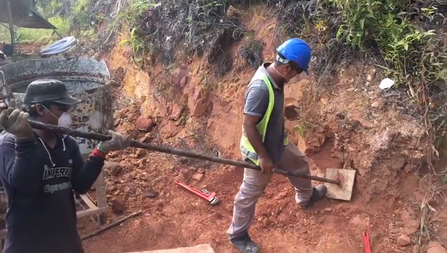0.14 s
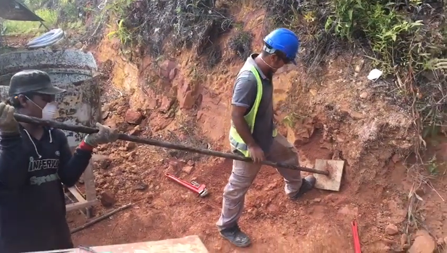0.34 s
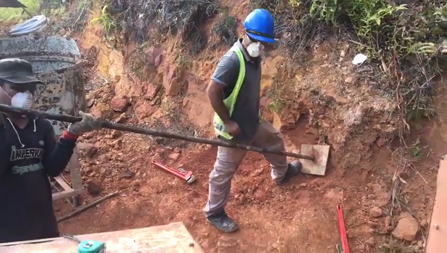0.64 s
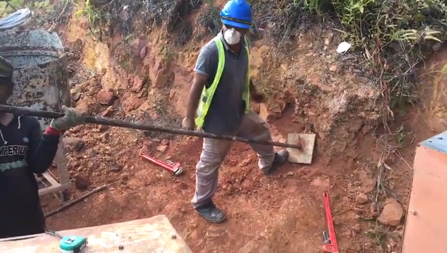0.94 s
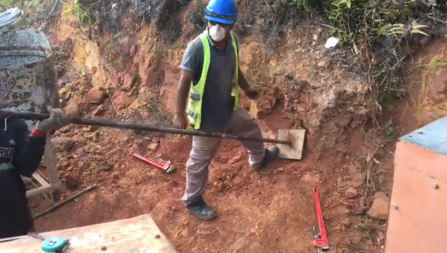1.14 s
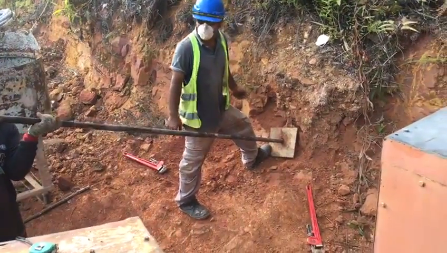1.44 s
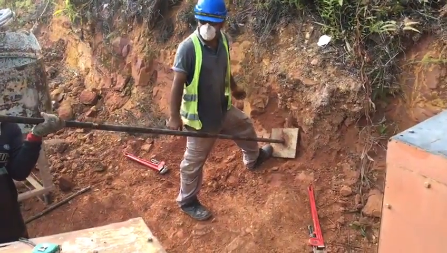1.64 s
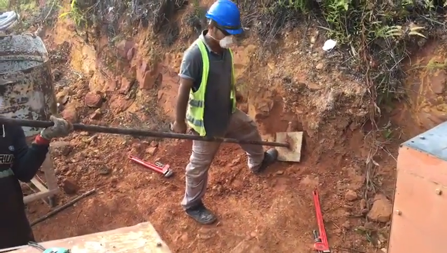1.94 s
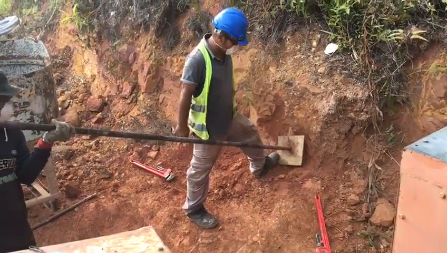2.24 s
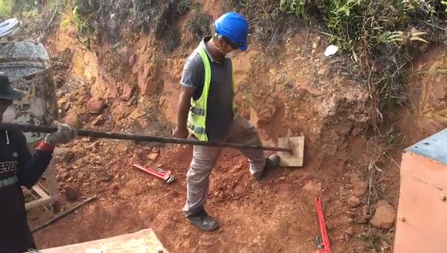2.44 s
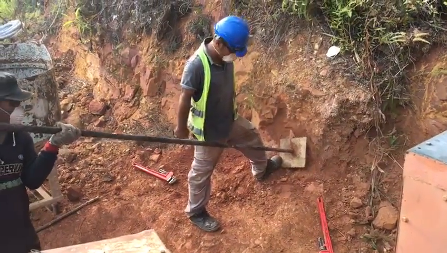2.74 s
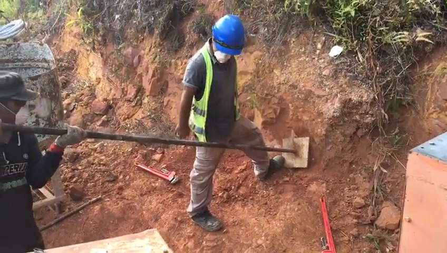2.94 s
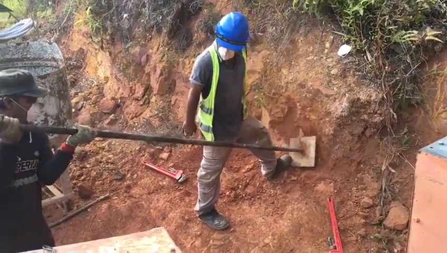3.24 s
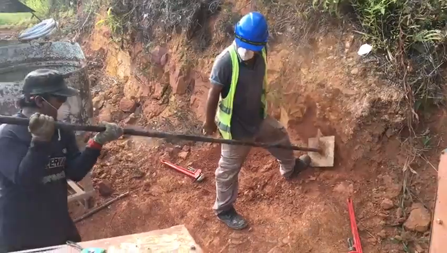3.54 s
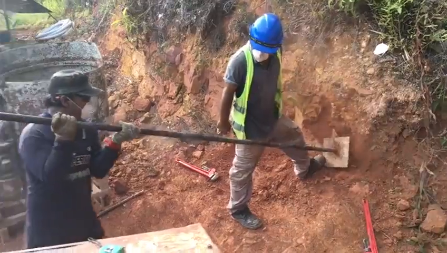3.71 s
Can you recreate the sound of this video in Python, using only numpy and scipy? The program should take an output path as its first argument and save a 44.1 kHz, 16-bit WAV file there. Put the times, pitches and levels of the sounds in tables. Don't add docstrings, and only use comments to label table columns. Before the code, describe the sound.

Pneumatic hammer bursts into rapid clanging blows over a droning compressor and broad rushing air outdoors.

```python
import sys
import numpy as np
from scipy import signal
from scipy.fft import rfft, irfft
from scipy.io import wavfile
from scipy.ndimage import uniform_filter1d

SR = 44100
rng = np.random.default_rng(int(sys.argv[2]) if len(sys.argv) > 2 else 0)


def log_audio(samples):
    frames = np.atleast_2d(samples).T
    limited = np.clip(frames, -1, 1)
    pcm = np.round(limited * 32767).astype(np.int16)
    wavfile.write(sys.argv[1], SR, pcm)


def invert_db(x):
    u = np.asarray(x, float) / 20
    return 10 ** u


N = 170667

FIRST_BLOW_S = 1.3725


def rms_one(x):
    return x / np.sqrt(np.mean(x ** 2) + 1e-20)


def in_time(rows, s=None):
    t, *columns = np.transpose(rows)
    at = np.arange(N) / SR if s is None else s
    return [np.interp(at, t, column) for column in columns]


def drift(rate_hz):
    r = np.exp(-2 * np.pi * rate_hz / SR)
    wander = signal.lfilter([1], [1, -2 * r, r * r], rng.standard_normal(N + SR))
    return rms_one(wander[SR:])


def band(x, low_hz, high_hz):
    return signal.sosfilt(signal.butter(2, [low_hz, high_hz], "band", fs=SR, output="sos"), x)


def ring(x, hz, t60_s):
    r, w = invert_db(-60 / (t60_s * SR)), 2 * np.pi * hz / SR
    return signal.lfilter([0, np.sin(w)], [1, -2 * r * np.cos(w), r * r], x + 1e-18)


def resonance(x, hz, width_hz):
    r = np.exp(-np.pi * width_hz / SR)
    top = np.array([1, 0, -1]) * (1 - r * r) / 2
    return signal.lfilter(top, [1, -2 * r * np.cos(2 * np.pi * hz / SR), r * r], x)


def clicks(s, db):
    out, inside = np.zeros(N), s < (N - 1) / SR
    np.add.at(out, (s[inside] * SR).astype(int), invert_db(db[inside]))
    return out


def dying(x, t60_s):
    return signal.lfilter([1], [1, -invert_db(-60 / (t60_s * SR))], x + 1e-18)


def soften(x, hz):
    r = np.exp(-2 * np.pi * hz / SR)
    return signal.lfilter([(1 - r) ** 2], [1, -2 * r, r * r], x)


def engine():
    # start_s, firing_hz, level_db
    firing = [(0, 66.5, -16), (.41, 67.23, -16), (.56, 68.94, -15.5), (.86, 71.1, -16), (.95, 74, -17.5),
              (1.25, 77.07, -22), (1.45, 80.3, -24), (1.6, 83.6, -40), (2.3, 73.5, -37), (2.7, 72.9, -34),
              (3.2, 72.2, -31.5), (3.87, 70.7, -30)]
    # start_s, pitch_hz, level_db
    whirr = [
        (0, 57.95, -43),
        (.85, 56.9, -45),
        (1.05, 53.3, -33),
        (1.3, 46.4, -30),
        (1.45, 38.3, -41),
        (1.55, 38.4, -46),
        (3.87, 41.7, -66),
    ]
    second_db, rumble_db, rumble_hz = -31.5, -36, 58.3

    hz, db = in_time(firing)
    phase = 2 * np.pi * np.cumsum(hz + 0.3 * drift(6.6)) / SR
    level = np.sqrt(2) * invert_db(db + 0.4 * drift(9))
    drone = level * (np.sin(phase) + invert_db(second_db) * np.sin(2 * phase))

    hz, db = in_time(whirr)
    drone += np.sqrt(2) * invert_db(db) * np.sin(2 * np.pi * np.cumsum(hz) / SR)

    rumble = rms_one(band(rng.standard_normal(N), 0.87 * rumble_hz, 1.76 * rumble_hz))
    return drone + invert_db(rumble_db) * rumble


def air(patchy_db):
    # start_s, level_db
    flow = [
        (0, -14.5),
        (.45, -14.5),
        (.9, -15),
        (1.3, -15),
        (1.6, -15),
        (1.9, -17.5),
        (2.3, -19),
        (2.7, -20),
        (3.2, -22.5),
        (3.87, -22),
    ]
    # pitch_hz, level_db (per Hz)
    colour = [(120, -11), (300, -13), (520, -9.5), (1060, -4.5), (2080, -3), (5370, -1), (10500, -5.5)]
    # pitch_hz, width_hz, gain_db
    peaks = [(2810, 1020, -5), (7410, 640, -4), (4885, 370, -6), (1970, 430, 1.5), (3830, 490, 2),
             (930, 220, 1.5), (412, 27, -9), (9530, 190, 4)]

    together = drift(18)
    edges = 100 * 2 ** np.arange(0, 7.1, .5)
    white = rng.standard_normal((2, N))
    hz, db = np.transpose(colour)
    out = 0
    for k, (low, high) in enumerate(zip(edges, edges[1:])):
        level_db = np.interp(np.log(low * high) / 2, np.log(hz), db)
        flicker_db = patchy_db * (.8 * together + drift(17))
        out = out + invert_db(level_db + flicker_db) * band(white[k % 2], low, high)
    for hz, width, db in peaks:
        out = out + (invert_db(db) - 1) * resonance(out, hz, width)
    return invert_db(in_time(flow)[0]) * rms_one(out)


def slope(x):
    # delay_s, level_db
    echoes = [(.009, -17), (.021, -12.5), (.038, -10.5)]
    out, dull = x.copy(), signal.lfilter([.5], [1, -.5], x)
    for s, db in echoes:
        out[int(s * SR):] += invert_db(db) * dull[:N - int(s * SR)]
    return out


def stroke_times():
    # start_s, strokes_per_s
    speed = [
        (1.37, 19.414),
        (1.5, 23.012),
        (1.65, 24.121),
        (1.85, 25.024),
        (2.1, 26.902),
        (2.4, 28.888),
        (2.7, 30.095),
        (3.0, 31.275),
        (3.3, 31.538),
        (3.87, 31.972),
    ]
    t = np.arange(N) / SR
    turns = np.cumsum(in_time(speed)[0] * (t >= FIRST_BLOW_S)) / SR
    return np.interp(np.arange(int(turns[-1]) + 1) + 1e-9, turns, t)


def rod(s):
    # start_s, level_db
    clangs = [(1.373, -15), (1.423, -14.5), (1.469, -19), (1.513, -10), (1.556, -10), (1.598, -7.5),
              (1.64, -9), (1.682, -11), (1.723, -16), (1.763, -12), (1.804, -10), (1.844, -12),
              (1.884, -12), (1.923, -10.5), (1.962, -12.5), (2.0, -10), (2.039, -11), (2.076, -12.5),
              (2.113, -8.5), (2.15, -14), (2.187, -16.5), (2.223, -6.5), (2.259, -14.5), (2.33, -8),
              (2.4, -9), (2.434, -19), (2.469, -13.5),
              (2.537, -8.5), (2.604, -8.5), (2.671, -10), (2.738, -9.5), (2.804, -11), (2.869, -14.5),
                   (2.901, -10.5), (2.934, -24), (2.966, -12), (3.03, -13), (3.094, -11), (3.158, -11.5),
                   (3.221, -19.5), (3.253, -10), (3.316, -11.5), (3.38, -17.5), (3.443, -9.5),
                   (3.475, -15.5), (3.506, -12.5), (3.601, -10.5), (3.664, -9.5), (3.789, -11.5),
                   (3.851, -9)]
    # pitch_hz, width_hz, gain_db
    modes = [(1610, 410, -4), (2296, 600, 3), (3140, 240, -4), (3870, 380, 4), (4640, 360, -10.5),
             (5534, 670, 4.5), (6190, 400, 0), (7900, 1400, -1.5), (9170, 1260, -5)]
    delay_s, rise_s, t60_s, chatter_per_s = 0.0007, 0.00079, 0.11, 9900
    broad_db, colour_spread_db = -5, 1

    t, db = np.transpose(clangs)
    nearest = np.abs(s[:, None] - t).argmin(axis=0)
    t = s[nearest] + delay_s
    luck = rng.standard_normal((len(t), len(modes)))
    r = np.exp(-1 / (rise_s * SR))
    hits = (rng.random(N) < chatter_per_s / SR) * rng.standard_normal(N)
    chatter = rms_one(hits * invert_db(2.46 * drift(140)))

    def shape(level_db):
        return chatter * signal.lfilter([1 - r], [1, -r], dying(clicks(t, level_db), t60_s))

    out = band(shape(db + broad_db + 8), 1320, 9600)
    for k, (hz, width, gain_db) in enumerate(modes):
        level_db = db + gain_db + 6 + colour_spread_db * luck[:, k]
        out = out + (-1) ** k * resonance(shape(level_db), hz, width)
    return out


def exhaust(s):
    # start_s, thump_db, pop_db, return_delay_s
    pressure = [
        (1.37, -13.5, -7, 0.028),
        (1.43, -12.5, -12, 0.021),
        (1.6, -11.5, -12.5, .021),
        (1.9, -11, -10, .017),
        (2.3, -11.5, -8, 0.014),
        (2.8, -12.5, -7.5, .012),
        (3.3, -13, -7, .0117),
        (3.87, -12.5, -7, 0.011),
    ]
    # pitch_hz, level_db, t60_s
    thump_modes = [(102.6, -24.5, 0.19), (137, -7.5, 0.07), (160.9, 0.5, 0.094), (220.6, -4.5, 0.11),
                   (253, -7.5, 0.064), (301, -10.5, 0.14)]
    # pitch_hz, level_db, t60_s
    pop_modes = [(475, -9, 0.038), (617.4, -0.5, 0.031), (723, -8, 0.035), (955, 4.5, 0.013),
                 (1135, 0.5, 0.0077), (1670, -5, 0.027)]
    thump_soft_hz, pop_soft_hz, pop_lead_s = 483, 2500, 0.000985
    return_pop_db, return_thump_db, return_jitter_s, stroke_spread_db = -5, -5, 0.00055, 2
    crack_db, crack_t60_s, puff_db, puff_t60_s = -5, 0.029, -13.5, 0.081

    thump_db, pop_db, delay = in_time(pressure, s)
    false_start_db = -5 * (s < FIRST_BLOW_S)
    thump_db, pop_db = thump_db + false_start_db, pop_db + false_start_db
    luck = rng.standard_normal((len(s), 18))
    back = s + delay + return_jitter_s * luck[:, 0]
    early, early_back = s - pop_lead_s, back - pop_lead_s

    thump = 0
    for k, (hz, db, t60) in enumerate(thump_modes):
        level = thump_db + db + stroke_spread_db * luck[:, 1 + k]
        knocks = clicks(s, level) + clicks(back, level + return_thump_db)
        thump = thump - ring(knocks, hz, t60)

    pop = 0
    for k, (hz, db, t60) in enumerate(pop_modes):
        level = pop_db + db - 5 + stroke_spread_db * luck[:, 7 + k]
        back_level = level + return_pop_db + 2 * luck[:, 14]
        pop = pop + ring(clicks(early, level) + clicks(early_back, back_level), hz, t60)

    crack = dying(clicks(early, pop_db + crack_db + 3.0 * luck[:, 15]), crack_t60_s)
    puff = dying(clicks(s, pop_db + puff_db) + clicks(back, pop_db + puff_db - 3.5), puff_t60_s)
    noise = crack * rms_one(band(rng.standard_normal(N), 1600, 8500))
    noise += puff * rms_one(band(rng.standard_normal(N), 397, 1200))
    return soften(thump, thump_soft_hz) + band(soften(pop, pop_soft_hz), 527, 2080) + noise


def scene():
    # pitch_hz, width_hz, gain_db
    ground_dips = [(358, 32.6, -15), (5030, 500, -4), (1430, 220, -3), (820, 114, -1)]
    s = stroke_times()
    false_start_s = 1.1
    hammer = exhaust(np.append(s, false_start_s)) + slope(rod(s))
    for hz, width, db in ground_dips:
        hammer = hammer + (invert_db(db) - 1) * resonance(hammer, hz, width)
    return (engine() + air(patchy_db=0.95) + hammer)[None]


def low_pass(x):
    return signal.sosfilt(signal.butter(12, 10790, fs=SR, output="sos"), x)


def record(dry):
    # low_hz, high_hz, level_db, open_share (part of the time, 0 to 1)
    top_edge = [(10150, 10350, -2, .75), (10350, 10520, -8, .3), (10550, 10780, -12, .2)]
    limit = 1.2

    x = signal.sosfilt(signal.butter(2, 40, "high", fs=SR, output="sos"), dry)
    spectrum = rfft(limit * np.tanh(x / limit))
    hz = np.arange(N // 2 + 1) * SR / N
    out = irfft(spectrum * (hz < top_edge[0][0]), N)
    for low, high, db, share in top_edge:
        chance = drift(12) + np.linspace(-.6, .6, N)
        is_open = 1. * (chance > np.quantile(chance, 1 - share))
        gate = uniform_filter1d(uniform_filter1d(is_open, size=700), size=700)
        out = out + invert_db(db) * gate * irfft(spectrum * (hz >= low) * (hz < high), N)
    return low_pass(np.clip(out, -1, 1))


dry = scene()
out = record(dry)
log_audio(out)
```